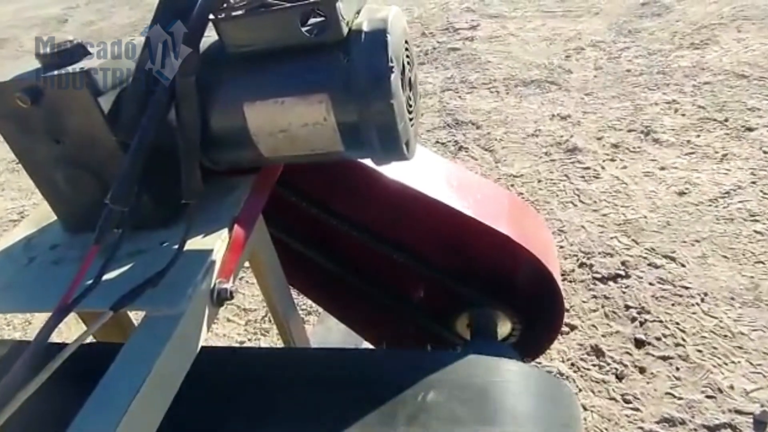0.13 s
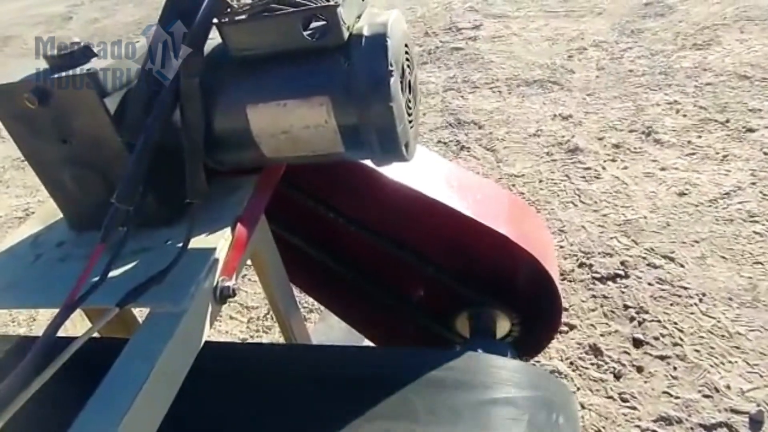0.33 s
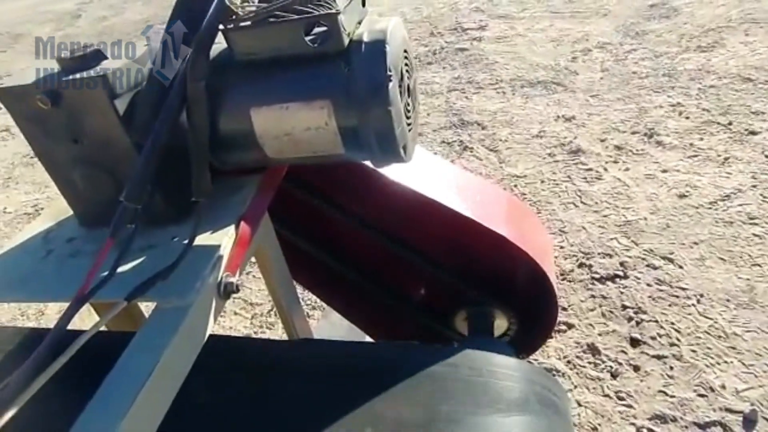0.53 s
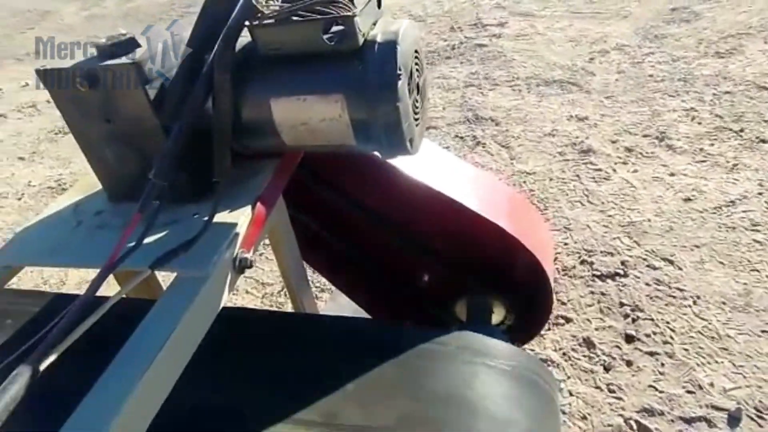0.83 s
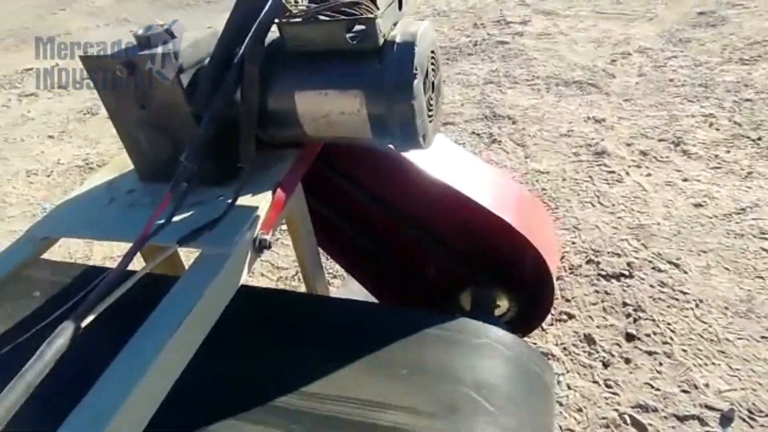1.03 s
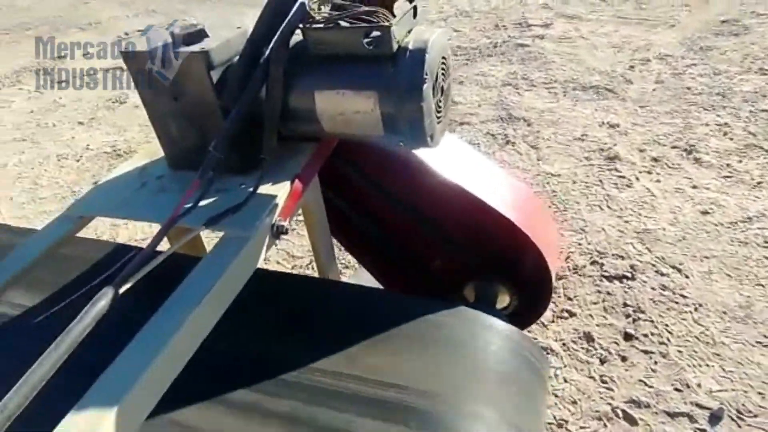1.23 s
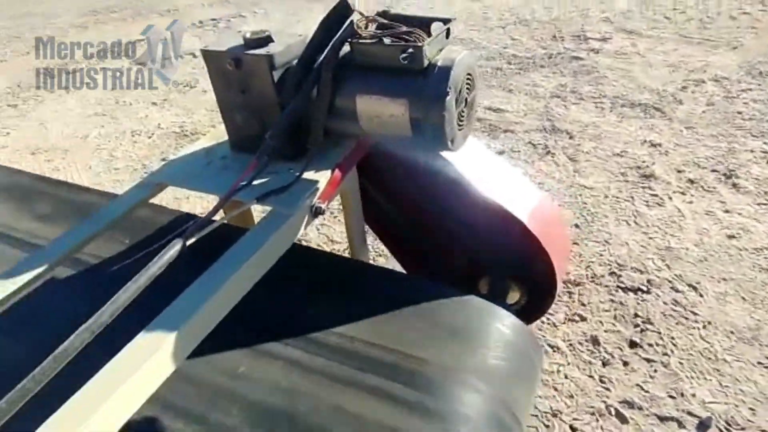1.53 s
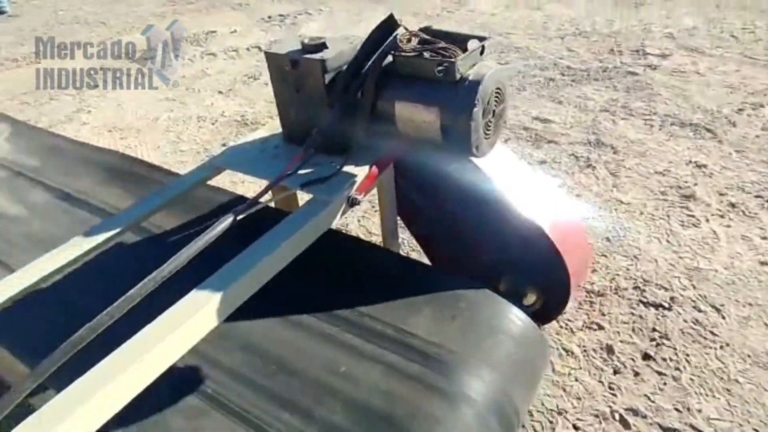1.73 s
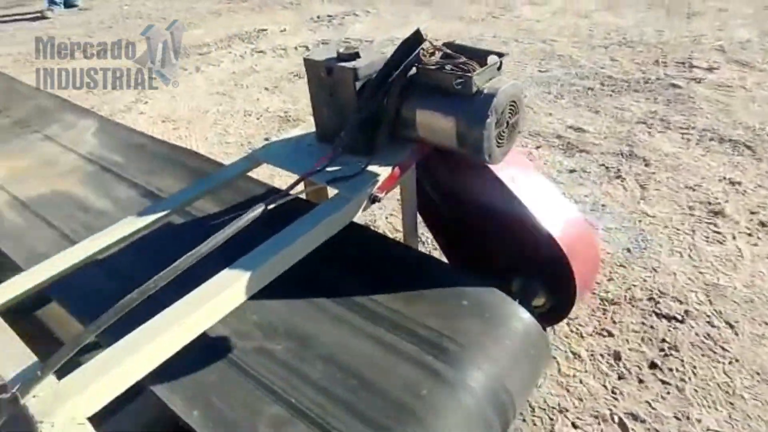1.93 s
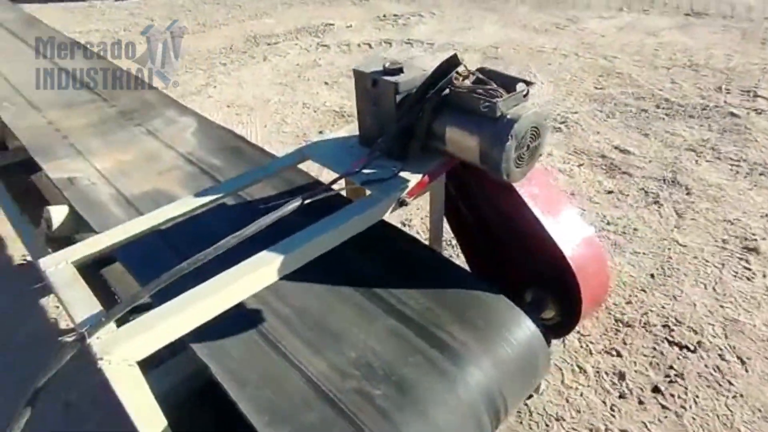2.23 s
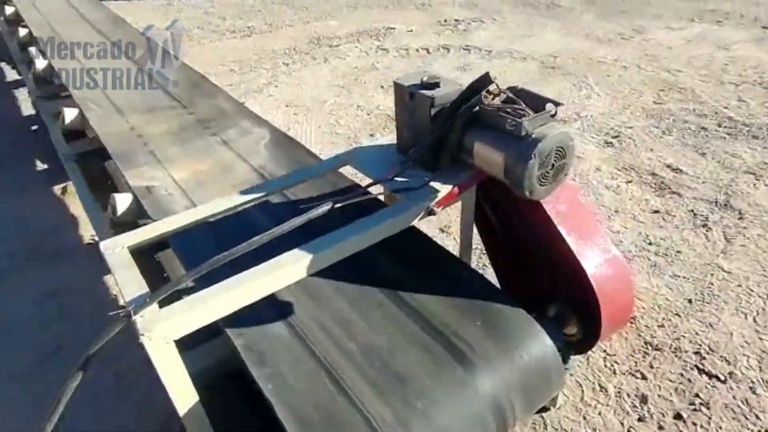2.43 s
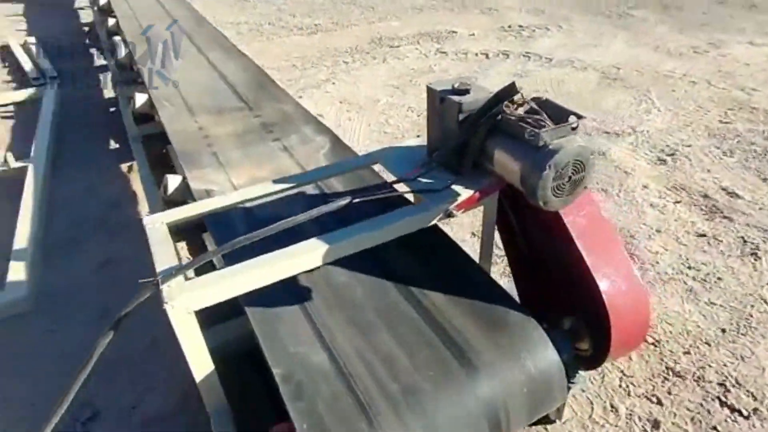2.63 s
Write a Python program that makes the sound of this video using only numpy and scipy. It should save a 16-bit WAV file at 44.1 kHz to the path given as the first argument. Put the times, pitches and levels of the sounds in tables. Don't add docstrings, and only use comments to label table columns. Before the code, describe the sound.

An electric motor running a conveyor belt drones with a fast metallic rattle and wavering high whine, slack drive belt knocking its sheet guard; brief wind buffets the left microphone, then everything recedes outdoors.

```python
import sys
import numpy as np
from scipy import signal
from scipy.fft import rfft, irfft
from scipy.io import wavfile
from scipy.ndimage import map_coordinates

SR = 44100
rng = np.random.default_rng(int(sys.argv[2]) if len(sys.argv) > 2 else 0)


def store_wav(level_fs):
    pcm = np.round(np.clip(np.atleast_2d(level_fs), -1, 1) * 32767)
    wavfile.write(sys.argv[1], SR, pcm.T.astype(np.int16))


def amplitude_ratio(level_db):
    exponent = np.asarray(level_db, float) / 20
    return 10 ** exponent


N = 123480
SHAFT_HZ = 27.6

# start_s, level_db, viewpoint (0 near, 1 middle, 2 far)
BEARING_PATH = [
    (0.0, -22.5, 0),
    (.4, -23.5, 0.13),
    (.72, -24.5, 0.065),
    (.86, -28, 0.22),
    (1.5, -30, 0.9),
    (1.9, -33.5, 1.37),
    (2.35, -37, 1.84),
    (2.6, -36.5, 2.2),
    (2.66, -40, 2.5),
    (2.8, -40, 1.7),
]
# start_s, level_db, viewpoint (0 near, 1 far)
HOUSING_PATH = [
    (0, -20, 0.05),
    (.7, -21.5, 0.18),
    (1.0, -22, 0.21),
    (1.7, -24, 0.68),
    (2.1, -26.5, 1),
    (2.22, -25.5, 0.96),
    (2.45, -27, 0.92),
    (2.6, -29.5, 0.68),
    (2.8, -30, 0.9),
]
# start_s, lead_turns
SHAFT_SLIP = [
    (0, .27),
    (.28, .33),
    (.63, .47),
    (.84, .43),
    (1.12, .23),
    (1.54, .24),
    (1.68, .36),
    (1.9, .3),
    (2.8, .33),
]


def evened(x):
    return x / np.sqrt(np.mean(x ** 2) + 1e-20)


def over_time(table, col):
    table = np.array(table, float)
    return np.interp(np.arange(N) / SR, table[:, 0], table[:, col])


def over_hz(points, hz):
    f, value = np.transpose(points)
    return np.interp(np.log(hz + 1), np.log(f + 1), value)


def slow(rate_hz):
    hz = np.fft.rfftfreq(N, 1 / SR)
    lowpass = (hz > 0) / (1 + (hz / rate_hz) ** 2)
    return evened(irfft(rfft(rng.standard_normal(N)) * lowpass, N))


def shaft_turns():
    return SHAFT_HZ * np.arange(N) / SR + over_time(SHAFT_SLIP, col=1)


def placed(x, share=1):
    # start_s, left_lead_samples
    direction = [
        (0, 7.5),
        (1.2, 6),
        (1.6, 4),
        (1.9, 3),
        (2.4, 2.5),
        (2.8, -2.5),
    ]
    moments = np.arange(N) + share * over_time(direction, col=1)
    left = map_coordinates(x[0], [moments], order=5, mode="mirror")
    return np.array([left, x[1]])


def ring(drive, loose, pitches, modes, body, view, ports=((1, 0, 0),)):
    hz = np.fft.rfftfreq(N, 1 / SR)
    drive_spectrum, loose_spectrum = rfft(drive), rfft(loose)
    shapes = []
    for pitch, mode in zip(pitches, modes):
        offset = (hz - pitch) / mode[0]
        shapes.append(1 / (1 + 2j * offset) / (1 + .3j * offset))
    last_view = len(modes[0]) - 2
    out = 0
    for k in range(1, len(modes[0])):
        ringing = sum(amplitude_ratio(mode[k]) * shape for mode, shape in zip(modes, shapes))
        colour = amplitude_ratio(over_hz([(row[0], row[k]) for row in body], hz))
        tilt = amplitude_ratio(over_hz([(row[0], row[k]) for row in ports], hz) / 2)
        spectrum = drive_spectrum * ringing + loose_spectrum * colour
        heard = evened(irfft(spectrum * np.array([tilt, 1 / tilt]), N))
        distance = abs(np.clip(view, 0, last_view) - (k - 1))
        out = out + heard * np.clip(1 - distance, 0, 1)
    return out


def rattle(depth_db, per_s, spread_db, wander_db, same):
    turns = shaft_turns() + .03 * slow(rate_hz=8)
    pulse = np.cos(2 * np.pi * turns) - .17 * np.sin(4 * np.pi * turns)
    beat = amplitude_ratio(depth_db * pulse + wander_db * slow(rate_hz=10))
    present = rng.random((2, N)) < per_s / SR
    strength = amplitude_ratio(spread_db * np.minimum(rng.exponential(1, (2, N)), 4))
    hits = rng.standard_normal((2, N)) * present * strength
    left = same * hits[1] + np.sqrt(1 - same ** 2) * hits[0]
    return beat * np.array([left, hits[1]])


def tone(hz, level_db, pan_db):
    flutter_db = 1.4 * slow(rate_hz=20)
    wave = np.sin(2 * np.pi * np.cumsum(hz) / SR) * amplitude_ratio(level_db + flutter_db)
    return wave * amplitude_ratio(np.array([[pan_db / 2], [-pan_db / 2]]))


def wind():
    # pitch_hz, level_db
    wind_colour = [(12, -51), (20, -24), (86, 3.5), (150, 3.5), (293, -0.5), (330, -20), (430, -59),
                   (730, -120)]
    # start_s, level_db
    gusts = [(0, -24), (.05, -36.5), (.1, -39), (.2, -55), (.31, -49), (.35, -31), (.4, -52), (.5, -44),
             (.6, -36), (.66, -46), (.78, -49), (.84, -33.5), (.92, -53), (.99, -46), (1.05, -72)]
    hz = np.fft.rfftfreq(N, 1 / SR)
    highcut = 1 / (1 + (hz / 340) ** 6)
    lowcut = hz ** 2 / (hz ** 2 + 40 ** 2)
    colour = amplitude_ratio(over_hz(wind_colour, hz)) * highcut * lowcut
    steady, gusty = evened(irfft(rfft(rng.standard_normal((2, N))) * colour, N))
    rumble_db = -48 - over_time(HOUSING_PATH, col=2) + 1.3 * slow(rate_hz=29)
    right_leak = .07
    gust = gusty * amplitude_ratio(over_time(gusts, col=1)) * np.array([[1], [right_leak]])
    return steady * amplitude_ratio(rumble_db) + gust


def guard():
    drone_hz = [361, 568, 730]
    # width_hz, near_db, far_db
    drone_modes = [(16, -6, -11), (45, -3, -14), (60, -10, -14)]
    # start_s, peak_db
    belt_knocks = [(0.225, -33), (0.338, -47), (0.443, -29), (0.555, -30), (0.678, -27.5), (0.922, -31.5),
                   (1.04, -31.5), (1.274, -32.5), (1.391, -31), (1.495, -30), (1.623, -30.5), (1.729, -43),
                   (1.855, -35.5), (2.084, -43), (2.194, -44), (2.422, -37.5), (2.549, -30.5), (2.653, -45),
                   (2.779, -45)]
    a, b = rng.standard_normal((2, N))
    shaking = np.array([a + 0.062 * b, a - 0.31 * b])
    # pitch_hz, near_db, far_db
    body = [(100, -18, -24.5), (374, -2, -9.0), (1000, -9.5, -39), (1500, -24.5, -45)]
    drone = ring(shaking, shaking, drone_hz, drone_modes, body, over_time(HOUSING_PATH, col=2))
    drone = drone * amplitude_ratio(-46 + 0.96 * (over_time(HOUSING_PATH, col=1) + 21.5))

    pitch_hz, rise_s, fall_60db_s = 366, 0.007, 0.065
    t = np.arange(0, .15, 1 / SR)
    knocks = np.zeros(N + SR)
    for start_s, peak_db in belt_knocks:
        detune, phase = rng.random(2)
        rise = np.sin(np.pi / 2 * np.minimum(t / rise_s, 1)) ** 2
        fall = amplitude_ratio(peak_db - 60 * np.maximum(t - rise_s, 0) / fall_60db_s)
        thud = np.sin(2 * np.pi * (pitch_hz * (0.933 + 0.11 * detune) * t + phase))
        knocks[round(start_s * SR):][:len(t)] += rise * fall * thud
    return drone + knocks[:N] * amplitude_ratio(np.array([[1.2], [-1.2]]))


def whine():
    # start_s, pitch_hz, level_db, swell_per_turn_db
    song = [(0, 2935, -28, 3), (.3, 2935, -28, 3.5), (.56, 2925, -22, 1.5), (.61, 2925, -33, 3),
            (.66, 2925, -23, 4), (.76, 2945, -33, 2), (.83, 2942, -26, 7), (1.03, 2945, -25, 7),
            (1.055, 2950, -38, 5), (1.09, 2942, -25, 6), (1.25, 2955, -31, 2), (1.6, 2935, -29, 2.5),
            (1.79, 2930, -29, 2), (1.83, 2945, -38, 4), (2.5, 2940, -43, 4), (2.68, 2930, -33, 2),
            (2.72, 2925, -42, 2)]
    # start_s, pitch_hz, level_db
    hum = [
        (0.0, 550.0, -47),
        (0.12, 571.1, -47.5),
        (0.48, 550.0, -51),
        (0.87, 577.4, -64),
        (0.91, 551.3, -50),
        (1.1, 570.5, -46.5),
        (1.38, 574.0, -57.5),
        (2.71, 569.7, -59),
        (2.8, 558.2, -55),
    ]
    side_hz = [361, 3131, 3543, 3574, 3895, 5078]
    # waver_hz, near_db, far_db, left_minus_right_db, swell_per_turn_db
    side_tones = [(5.3, -49.5, -50.5, 1, 1), (10.3, -29.5, -29, -13.5, -1), (5.5, -38, -32, -6.5, 8),
                  (3.5, -38.5, -44, -16, 4.5), (8, -80, -44, 0, 6), (10.4, -60, -45.5, -6, 9.5)]
    far = over_time(BEARING_PATH, col=2) / 2
    turns = shaft_turns()
    swell_db = over_time(song, col=3) * np.cos(2 * np.pi * (turns - .42))
    song_hz = over_time(song, col=1) + 6.86 * slow(rate_hz=17.5)
    out = tone(song_hz, over_time(song, col=2) + 1 + swell_db, pan_db=-13)
    hum_hz = over_time(hum, col=1) + 4 * slow(rate_hz=23.5)
    out = out + tone(hum_hz, over_time(hum, col=2) + 0.83, pan_db=-1.5)
    for pitch_hz, (waver_hz, near_db, far_db, pan_db, beat_db) in zip(side_hz, side_tones):
        level_db = near_db + (far_db - near_db) * far + 0.5
        level_db = level_db + 1.2 * (over_time(HOUSING_PATH, col=1) + 23)
        level_db = level_db + beat_db * np.cos(2 * np.pi * turns)
        out = out + tone(pitch_hz + waver_hz * slow(rate_hz=24.3), level_db, pan_db)
    return placed(out, share=0.79)


def housing():
    shell_hz = [1345, 1495, 1595, 1895, 2112, 2365, 2762, 2928, 2962, 3131, 3543, 3574, 3890, 4420]
    frame_hz = [1410, 1750, 1820, 2250, 2460, 2635, 3243, 3490]
    # width_hz, near_db, far_db
    housing_modes = [(61, -14, -55), (42.4, -11.5, -6.5), (23.8, -16.5, -8.5), (34.8, -9, -8),
                     (16, -8.5, -21), (40, -13.5, -10.5), (29.8, -15, -9.5), (25.5, -3, -18),
                     (19.8, -14, -19), (21.9, -9.5, -2), (15.8, -4, -10), (14, -7, -7), (33, -14.5, -10.5),
                     (22.2, -8, -58),
                     (40, -13, -17), (30, -14, -16), (25, -16, -14), (25, -15, -15), (60, -14, -13),
                   (22, -15, -16), (12, -15, -20), (45, -17, -18)]
    # pitch_hz, near_db, far_db
    shell_body = [(587, -52.5, -39), (1100, -36, -27), (1360, -22, -32), (1910, -25, -18.5),
                  (3280, -22, -14.5), (3440, -14.5, -22.5), (4140, -20.5, -35.5), (5460, -70, -45)]
    # pitch_hz, left_minus_right_db
    port_balance = [(300, -15), (700, 0), (1500, -3.5), (2200, -7.5), (3000, -14), (3800, -4.5)]
    drive = rattle(depth_db=1.0, per_s=20000, spread_db=0.46, wander_db=0.5, same=0.81)
    loose = rattle(depth_db=1.0, per_s=20000, spread_db=0.46, wander_db=0.5, same=0.57)
    ports = [(f, db, db) for f, db in port_balance]
    view = over_time(HOUSING_PATH, col=2)
    y = ring(drive, loose, shell_hz + frame_hz, housing_modes, shell_body, view, ports)
    return amplitude_ratio(over_time(HOUSING_PATH, col=1) + 1.5) * placed(y, share=0.79)


def bearing():
    race_hz = [4776, 4985, 5081, 5283, 5485, 5587, 5945, 6090, 6294, 7005, 7606, 8390, 8895, 9600]
    cap_hz = [6570, 6795, 7150, 7270, 7530, 8000, 9320, 9800, 9955]
    top_hz = [10420, 10720, 10950, 11310, 11660, 12070, 12300, 13000, 13200]
    # width_hz, near_db, middle_db, far_db
    bearing_modes = [(22, 4.5, -21, -22), (28, -2, -3, -18), (36.6, 1, -0.5, 1), (24, -5, -17, -17),
                     (44.7, -2, -20, -17), (28, -3, -8, -20), (24, -13, -4, -3), (38, -7, -2, -5.5),
                     (29.3, 0.5, -19, -6), (59.6, -3, -9, 1), (39.6, -5, 0, -5), (68.4, -4, -1.5, -6),
                     (55, -3.5, -3, -9), (40, -13, -18, -13),
                     (31.8, -6, -4, -2), (32, -8, -6, -2), (40, -12, -7, -10), (45, -6, -22, -21),
                 (45, -20, -14, -15), (90, -10.5, -10, -26), (50, -15, -15, -19), (40, -16, -14, -9),
                 (40, -7.5, -9, -21),
                     (60, -30, -10, -26), (130, -16, -16, -21), (110, -16, -22, -22), (50, -17, -16, -16),
                 (90, -16, -15, -16), (60, -24, -22, -10), (110, -24, -24, -24), (100, -19, -17, -14),
                 (60, -30, -30, -22)]
    # pitch_hz, near_db, middle_db, far_db
    race_body = [(3260, -36, -29.5, -28.5), (4100, -14, -13.5, -20), (5260, -4, -5.5, -17),
                 (6060, -11, -7, -6.5), (9850, -13, -12, -15), (10200, -27, -22.5, -20.5),
                 (13100, -30, -26.5, -21), (13500, -32, -40, -38), (15500, -39, -44, -27)]
    # pitch_hz, near_db, middle_db, far_db
    treble_balance = [(4230, -13, 2, 6), (4920, 2, 10.5, 16), (5290, -11.5, 10, 13), (6500, 0.5, -1, -4.5),
                      (7860, -12, 0.5, 6.5), (9500, -8.5, -4, 3), (10100, 0, 2, 10), (15000, 7.5, 4, -6)]
    lower = rattle(depth_db=4.4, per_s=16000, spread_db=.9, wander_db=1.1, same=.7)
    upper = rattle(depth_db=4.4, per_s=16000, spread_db=.9, wander_db=1.1, same=.9)
    low = np.fft.rfftfreq(N, 1 / SR) < 5900
    drive = irfft(rfft(placed(lower)) * low + rfft(upper) * ~low, N)
    pitches = race_hz + cap_hz + top_hz
    modes = bearing_modes
    y = ring(drive, drive, pitches, modes, race_body, over_time(BEARING_PATH, col=2), treble_balance)
    return amplitude_ratio(over_time(BEARING_PATH, col=1) + 3.0) * y


def scene():
    return wind() + guard() + whine() + housing() + bearing()


def band_limit(x):
    return signal.sosfilt(signal.butter(12, 15760, fs=SR, output="sos"), x)


def record(dry):
    return band_limit(dry)


dry = scene()
out = record(dry)
store_wav(out)
```